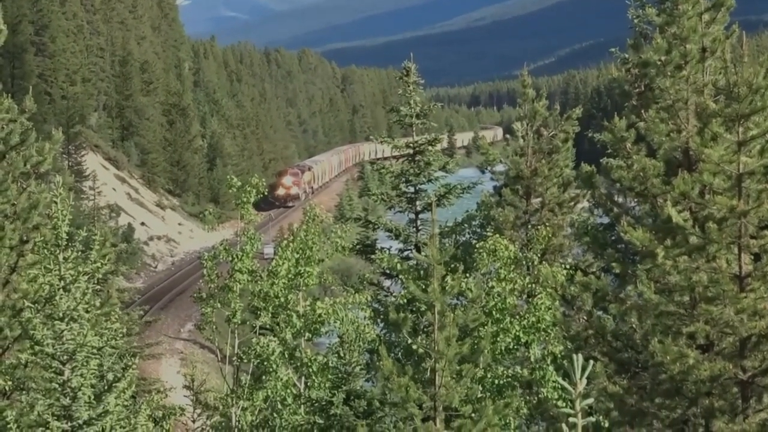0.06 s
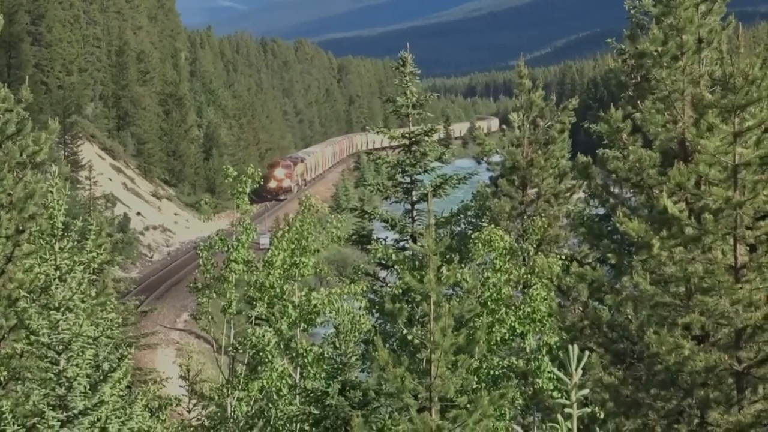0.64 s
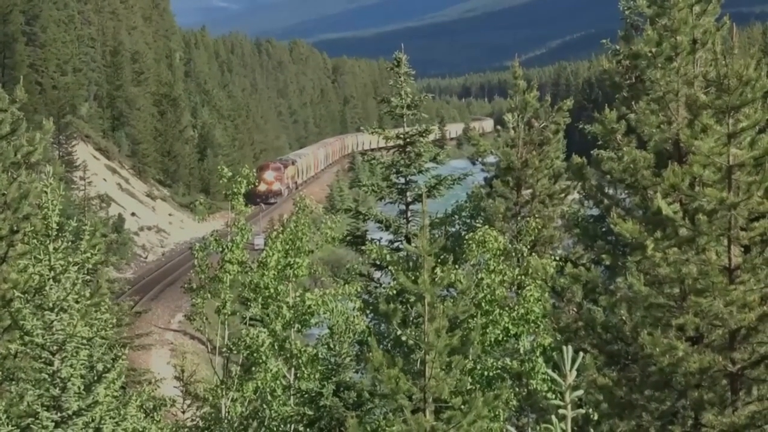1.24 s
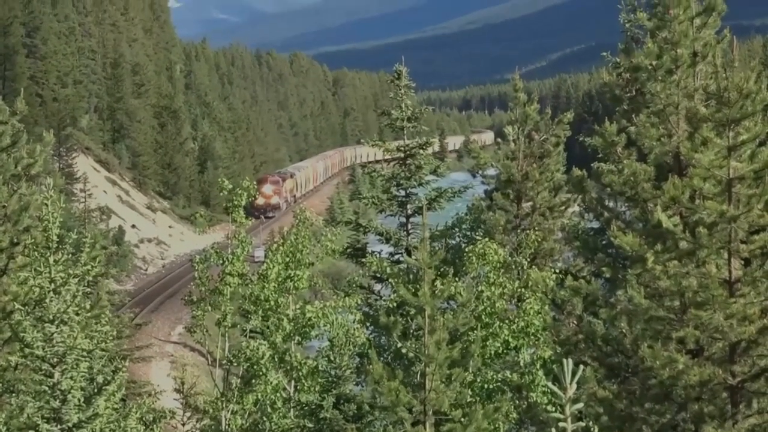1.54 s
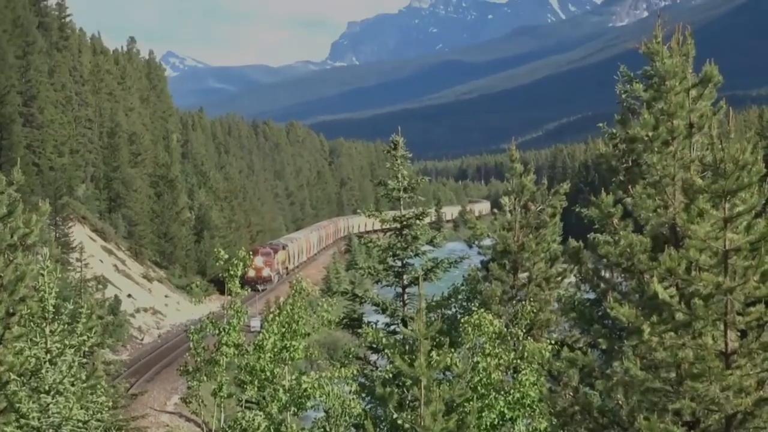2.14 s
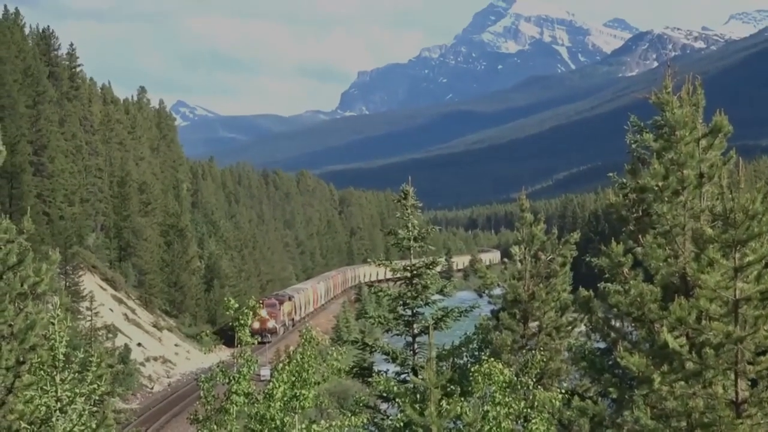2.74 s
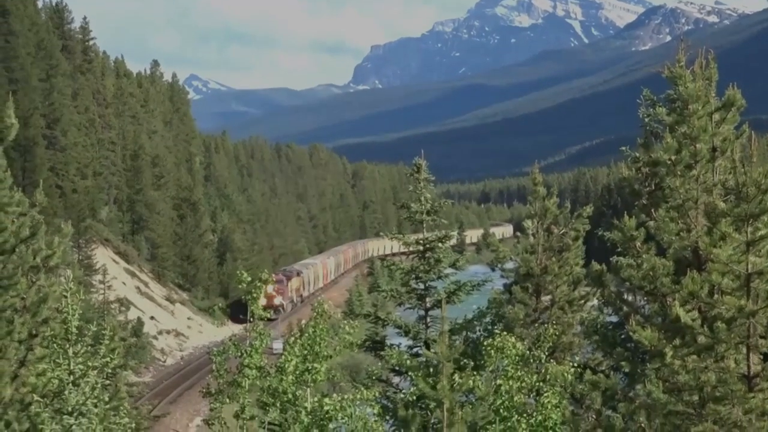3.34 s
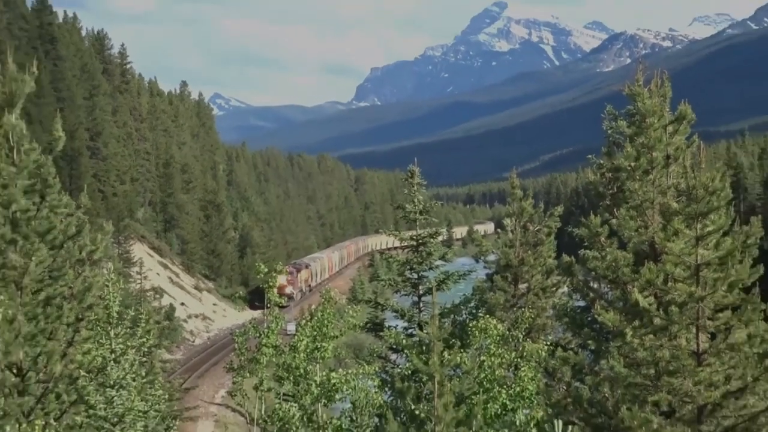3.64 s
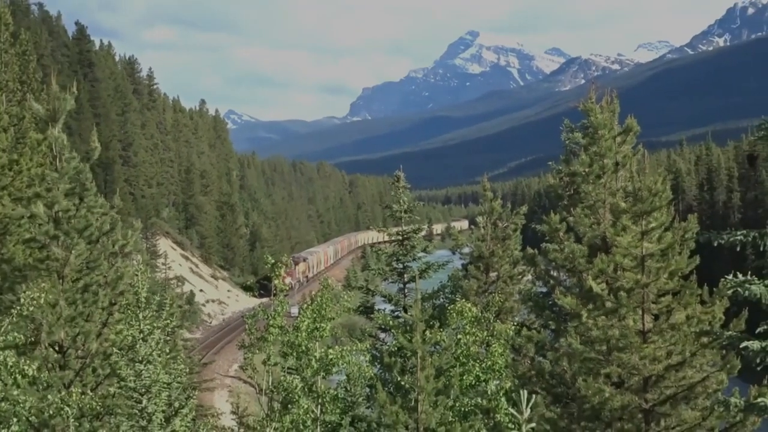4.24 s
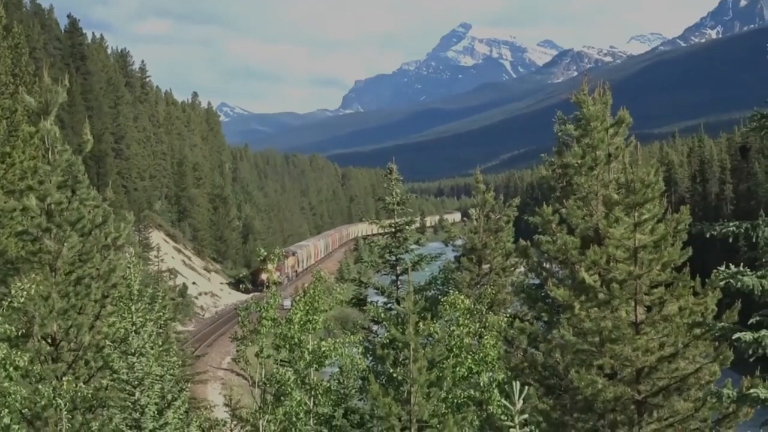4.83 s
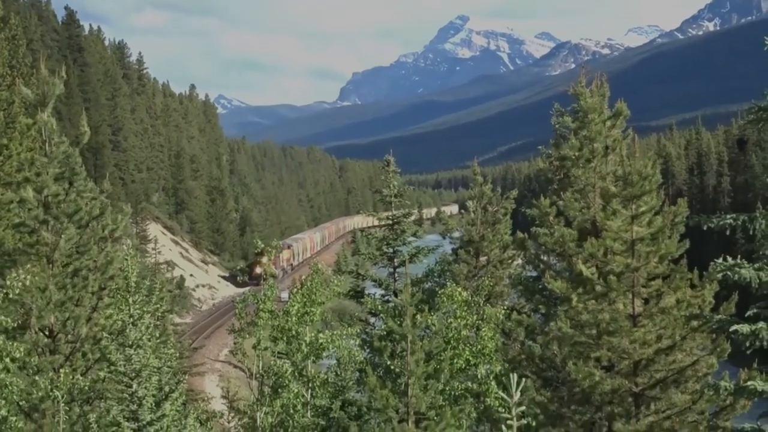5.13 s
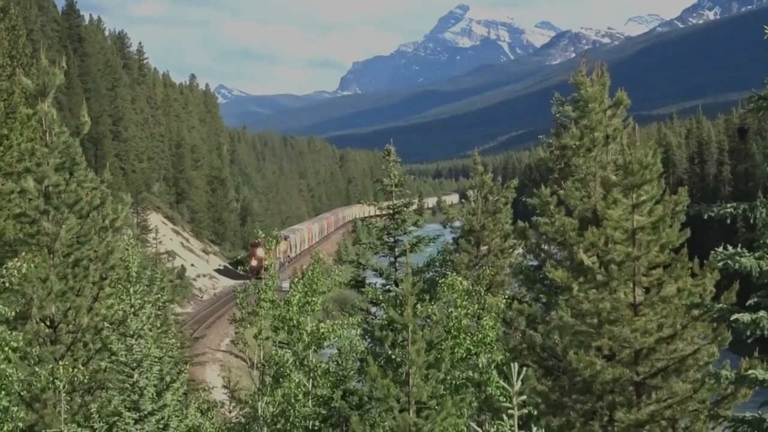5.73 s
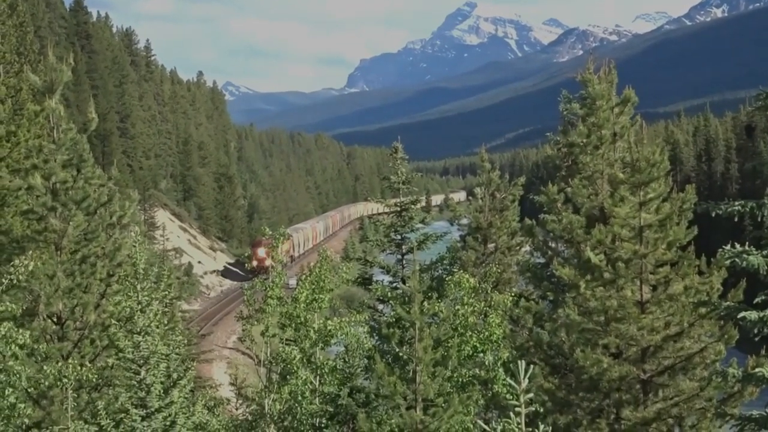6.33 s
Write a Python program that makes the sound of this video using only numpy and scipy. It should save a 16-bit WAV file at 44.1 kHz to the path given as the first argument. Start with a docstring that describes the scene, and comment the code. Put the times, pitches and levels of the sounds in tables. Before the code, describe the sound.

Distant diesel locomotives haul a freight train through a wooded valley for about six and a half seconds. From the start, a deep drone throbs about three times a second under a blurred, echoing exhaust roar and an even, lightly clattering rush of wheels. The rumble and rush grow gradually louder. The exhaust surges with a harder edge around 1 and 3 seconds, then several times after 4.5 seconds. From about 4.3 seconds the train sounds slightly brighter, and the wavering, mid-pitched hum of its radiator fans comes forward. From 5.8 seconds to the end, the wheels give a few thin, high, very brief squeals on a curve. Close to the microphone there is only a faint steady hiss, a few tiny dry ticks, and the very soft, high whirr of a camera's zoom motor from about 3.5 to 4.1 seconds.

```python
"""Diesel locomotives haul a freight train up a forested valley, far off, drawing nearer and rounding
a bank into the open. Their exhaust beats echo off the slopes and blur into a roar, while their radiator
fans hum. Under that is the rush of rolling wheels, with a few thin squeals from the curve near the end.
Close by there are only a faint hiss, some tiny ticks and the short whirr of a camera's zoom motor."""
import sys
import numpy as np
from scipy import signal
from scipy.fft import rfft, irfft, next_fast_len
from scipy.io import wavfile
from scipy.ndimage import uniform_filter1d, map_coordinates

SR = 44100
rng = np.random.default_rng(int(sys.argv[2]) if len(sys.argv) > 2 else 0)


def int16_out(signal):
    """Quantize to a 16-bit WAV file."""
    q = np.round(np.clip(np.atleast_2d(signal).T, -1, 1) * 32767)
    wavfile.write(sys.argv[1], SR, q.astype(np.int16))


N = 285768

# The tone colour of four noises. Each row: frequency in Hz, relative level in dB.
HISS_SPECTRUM = [(3000, -0.5), (5300, -0.5), (7100, 2), (7850, -7), (8350, -2.5), (8850, -3), (9800, -0.5),
                 (11000, 2), (11500, -2), (12200, -10), (15600, -13)]
ZOOM_SPECTRUM = [(7700, -30), (8270, 2), (8800, -20), (9500, -2), (10650, 5), (11200, -14), (15000, -24)]
WHEEL_SPECTRUM = [(200, -4), (500, -3.5), (800, -2), (1000, 1), (1270, -1), (1450, -5), (2050, -9.5),
                  (2900, -12.5), (3400, -16.5), (3650, -21), (3950, -22), (4300, -29), (4800, -32.5),
                  (5600, -59)]
RUMBLE_SPECTRUM = [(8, -24), (20, -14), (35, -7.5), (55, -3.5), (75, -4.5), (100, -3.5), (140, -2.5),
                   (300, -69)]
# How alike left and right sound. Each row: frequency in Hz, likeness from 0 to 1.
HISS_LIKENESS = [(5000, 0.73), (7200, 0.54), (8500, 0.84), (10500, 1), (13000, 1)]
TRAIN_LIKENESS = [(70, 0.98), (140, 0.99), (250, 0.99), (480, 0.98), (620, 1), (850, 0.94), (1200, 0.96),
                  (1500, 0.88), (2000, 0.93), (2900, 0.98), (3800, 0.93), (4800, 1)]
# Runs of the zoom motor. Each row: start in seconds, end in seconds, effort from 0 to 1.
ZOOM_RUNS = [(3.47, 4.023, 1), (4.07, 4.14, .7)]
# Dry ticks. Each row: time in seconds, level in dB, centre in Hz, spread in Hz, rough length in seconds.
NEARBY_TICKS = [(.034, -40, 13800, 1900, .002), (.078, -49, 11800, 2600, 0.0038),
                (0.733, -56, 9300, 800, 0.01), (3.173, -57.5, 10700, 900, .018),
                (5.395, -48, 4500, 4800, 0.012), (6.164, -48.5, 4620, 170, 0.007),
                (6.294, -51, 4550, 260, 0.008)]
# Wheel squeals. Each row: start and length in seconds, first pitch and its fall in Hz, base level in dB.
WHEEL_SQUEALS = [(5.82, 0.044, 3120, 15, -46), (5.952, 0.04, 3240, 30, -47), (5.996, .052, 3110, 10, -46),
                 (6.042, .05, 3130, 30, -42.5), (6.2, 0.072, 3530, 90, -43), (6.33, 0.096, 3505, 35, -41)]
# Notes of the radiator fan blades. Each row: pitch in Hz, level behind the bank in dB.
FAN_NOTES = [(580.5, -41.5), (610, -43), (634, -46)]
# Firm exhaust notes. Each row: pitch in Hz, level behind the bank in dB, change in the open in dB.
EXHAUST_NOTES = [(145.2, -34.5, -6), (232.3, -39, 4.5)]
# The locomotives' engines. Each row: firings per second, relative level in dB.
DIESEL_ENGINES = [(70.4, 0.5), (73.4, -2.5), (77, -5)]
# Where the exhaust resonates: the muffler's roar, the ring of the stack (the chimney), a harder bark.
# Each row: centre in Hz, rough width in Hz, relative level in dB.
MUFFLER_RESONANCES = [(215.7, 66, 0.5), (249, 71, -5.5), (338, 73, -6.5), (444, 103, -11)]
STACK_RESONANCES = [(579, 46, 0.5), (629, 50, -1), (692, 64, -8.5)]
BARK_RESONANCES = [(267, 40, 0.5), (352, 43, -5.5)]
# Roar and ring swell unevenly over the distance; the bark comes through in surges.
# Each row: time in seconds, level in dB.
ROAR_SWELLS = [(0.0, -23), (0.96, -22), (1.1, -22.5), (2.24, -22.5), (2.4, -23.5), (3.2, -22),
               (4.08, -22.5), (4.32, -19.5), (4.4, -24), (4.56, -22), (4.66, -21.5), (5.2, -22.5),
               (5.6, -21.5), (6.01, -20), (6.08, -17), (6.14, -19.5), (6.46, -20)]
RING_SWELLS = [(0.0, -30.5), (0.24, -29.5), (0.4, -34.5), (0.8, -27), (0.96, -31.5), (1.92, -27.5),
               (2.0, -32.5), (2.16, -28.5), (2.32, -31.5), (2.72, -29), (2.96, -30), (3.28, -28.5),
               (3.68, -30.5), (3.92, -27), (5.4, -28), (5.54, -28.5), (5.62, -27.5), (6.46, -28.5)]
BARK_SURGES = [(0.75, -47), (0.95, -27), (1.15, -43), (2.7, -39), (2.9, -31), (3.1, -37), (4.42, -34),
               (4.56, -25), (4.72, -38), (5.0, -30), (5.22, -24), (5.55, -25), (5.75, -31), (6.2, -27),
               (6.46, -32)]
# The sound leans to the right. Each row: frequency in Hz, left level minus right level in dB.
LEFT_RIGHT_BALANCE = [(600, -0.5), (1100, -1), (1600, -2), (3000, -1), (4000, -2.1), (5500, -1.4),
                      (6800, -3.5), (8000, -1), (9000, -2), (10500, 0)]


def amp(db):
    """Turn decibels into a number to multiply by."""
    return 10 ** (np.asarray(db) / 20)


def unit(x):
    """Scale a signal to an average power of 1."""
    return x / np.sqrt(np.mean(x ** 2) + 1e-20)


def over_pitch(points, hz):
    """Read between the rows of a (Hz, value) table, on a log frequency scale."""
    freqs, values = np.transpose(points)
    return np.interp(np.log(hz + 1), np.log(freqs + 1), values)


def over_time(points):
    """Turn a (seconds, value) table into one value per sample."""
    return np.interp(np.arange(N) / SR, *np.transpose(points))


def wobble(rate):
    """A smooth curve through `rate` random points a second."""
    knots = rng.standard_normal(int(N * rate / SR) + 4)
    fine = np.arange(0, len(knots) - 1, 1 / 10)
    return np.interp(np.arange(N) * rate / SR, fine, map_coordinates(knots, [fine]))


def filtered(x, response):
    """Multiply each frequency in x by response(hz)."""
    size = next_fast_len(N + SR // 8)
    return irfft(rfft(x, size) * response(np.fft.rfftfreq(size, 1 / SR)), size)[..., :N]


def steady(pair, span_s):
    """Even out the slow chance swells in a pair of signals."""
    power = np.abs(uniform_filter1d(np.mean(pair ** 2, axis=0), size=int(span_s * SR)))
    return unit(pair / np.sqrt(power + 1e-9))


def stereo(pair, colour, likeness):
    """Give two unrelated signals a tone colour and blend them into left and right."""
    def shares(hz):
        alike = np.clip(over_pitch(likeness, hz), -1, 1)
        return np.sqrt((1 + np.outer([1, -1], alike)) / 2)
    mid, side = filtered(pair, lambda hz: colour(hz) * shares(hz))
    return unit(np.array([mid + side, mid - side]))


def rush(spectrum, likeness, patchy_db):
    """Stereo noise with random louder and softer patches in pitch and time."""
    cells = signal.stft(rng.standard_normal((2, N)), nperseg=512)[2]
    patches = uniform_filter1d(rng.standard_normal(cells.shape[1:]), size=6, axis=0)
    patches = uniform_filter1d(patches, size=14, axis=1)
    pair = signal.istft(cells * amp(patchy_db * unit(patches)), nperseg=512)[1][:, :N]
    top_hz = 2 * spectrum[-1][0]
    return stereo(pair, lambda hz: amp(over_pitch(spectrum, hz)) * (hz < top_hz), likeness)


def valley(x, fade_s):
    """The wooded slopes scatter a sound into two blurred echoes that fall 60 dB in fade_s."""
    tails = rng.standard_normal((2, SR)) * amp(-60 * np.arange(SR) / SR / fade_s)
    return signal.fftconvolve(x[None], tails / np.linalg.norm(tails[0]), axes=1)[:, :N]


def approach(start_db, db_per_s):
    """The growing loudness of something that comes steadily nearer."""
    return amp(start_db + db_per_s * np.arange(N) / SR)


def in_the_open(start_s=4.26, takes_s=1.7):
    """0 while the bank hides the front of the train, rising to 1 as it rounds the curve."""
    return np.clip((np.arange(N) / SR - start_s) / takes_s, 0, 1)


def hiss_and_zoom(hiss_db=-57, whirr_db=-64, dip_db=-4, spin_up_s=.02):
    """A faint steady hiss, whose lower part sinks while the zoom motor whirrs."""
    t = np.arange(N) / SR
    running = sum(effort * np.clip(np.minimum(t - start, end - t) / spin_up_s, 0, 1)
                  for start, end, effort in ZOOM_RUNS)
    hiss = amp(hiss_db) * steady(rush(HISS_SPECTRUM, HISS_LIKENESS, patchy_db=1.6), span_s=.1)
    lower_hiss = filtered(hiss, lambda hz: hz < 7700)
    whirr = amp(whirr_db) * steady(rush(ZOOM_SPECTRUM, HISS_LIKENESS, patchy_db=1.5), span_s=.05)
    return hiss + running * (whirr + (amp(dip_db) - 1) * lower_hiss)


def ticks():
    """Each tick is a very short puff of high noise."""
    t, freqs = np.arange(SR // 8) / SR, np.fft.rfftfreq(SR // 8, 1 / SR)
    out = np.zeros(N + SR)
    for peak_s, db, hz, spread, length in NEARBY_TICKS:
        band = np.exp(-.5 * ((freqs - hz) / spread) ** 2)
        noise = unit(irfft(rfft(rng.standard_normal(len(t))) * band, len(t)))
        start = max(round((peak_s - 2 * length) * SR), 0)
        out[start:start + len(t)] += amp(db) * noise * np.exp(-2 * (t / length - 2) ** 2)
    return out[:N]


def squeals(waver=.0064, edge_s=.0099, echo_db=-14, chatter_db=1.5):
    """A wheel's rim rubs the curved rail: a thin tone that sags in pitch, smeared by the slopes."""
    t, out = np.arange(N) / SR, np.zeros(N)
    unsteady = 1 + waver * wobble(180)
    pressure = amp(chatter_db * wobble(90))
    for start, length, start_hz, fall_hz, db in WHEEL_SQUEALS:
        on = (t > start) & (t < start + length)
        age = t[on] - start
        pitch = (start_hz - fall_hz * age / length) * unsteady[on]
        grip = np.clip(np.minimum(age, length - age) / edge_s, 0, 1) * pressure[on]
        out[on] += amp(db) * grip * np.sqrt(2) * np.sin(2 * np.pi * np.cumsum(pitch) / SR)
    direct = out * amp([[-2.5], [1.5]])  # louder on the right
    return direct + amp(echo_db) * valley(out, fade_s=.2)


def wheels(treble_hz=3480, open_treble_db=3):
    """Hundreds of steel wheels roll as one distant, slightly clattering rush, brighter in the open."""
    clatter_db = .34 * wobble(45) + 1.12 * wobble(110)
    noise = rush(WHEEL_SPECTRUM, TRAIN_LIKENESS, patchy_db=.83)
    rolling = steady(amp(clatter_db) * noise, span_s=.16)
    treble = filtered(rolling, lambda hz: hz > treble_hz)
    brightened = rolling + (amp(open_treble_db * in_the_open()) - 1) * treble
    return approach(start_db=-31.5, db_per_s=.43) * brightened


def far_note(hz, waver, fading_db):
    """A machine's tone that wavers and fades in and out on its way through the air."""
    pitch = hz * (1 + waver * wobble(9))
    tone = np.sin(2 * np.pi * np.cumsum(pitch) / SR)
    return unit(tone * amp(fading_db * wobble(5)))


def fans(open_gain_db=7.5):
    """Each radiator fan hums on its own note, heard better once the engines are in the open."""
    hum = sum(amp(db) * far_note(hz, waver=.0019, fading_db=4) for hz, db in FAN_NOTES)
    return amp(open_gain_db * in_the_open()) * hum


def exhaust_notes():
    """Two low multiples of the firing rates stand out; the higher one takes over in the open."""
    return sum(amp(db + open_db * in_the_open()) * far_note(hz, waver=.01382, fading_db=3.5)
               for hz, db, open_db in EXHAUST_NOTES)


def firings(rate_hz, drift=.014, uneven=.35, scatter=.78, cylinders=12):
    """One exhaust pulse per firing; each cylinder has its own strength, and no two cycles are equal."""
    fired = np.cumsum(rate_hz * (1 + drift * wobble(5))) / SR
    at = np.flatnonzero(np.diff(np.floor(fired)))
    strengths = 1 + uneven * rng.standard_normal(cylinders)
    sizes = np.resize(strengths, len(at)) + scatter * rng.standard_normal(N)[:len(at)]
    pulses = np.bincount(at, sizes, N)
    return unit(pulses - pulses.mean())


def exhaust(beats, resonances, beats_db):
    """Beats and the noise of swirling gas sound through the exhaust's resonances."""
    def peak(hz, centre, width):
        return (hz * width) ** 2 / ((centre ** 2 - hz ** 2) ** 2 + (hz * width) ** 2)
    def colour(hz):
        powers = [(amp(db) * peak(hz, centre, 2 * width)) ** 2 for centre, width, db in resonances]
        return np.sqrt(sum(powers))
    blast = amp(beats_db) * beats + rng.standard_normal((2, N))
    return steady(stereo(blast, colour, TRAIN_LIKENESS), span_s=.137)


def locomotives(drone_db=-30.5, throb_hz=2.91, throb_db=3, throb_peak_s=.0094, flutter_db=.2):
    """Three engines' beats, blurred by the slopes, drone, roar, ring and bark over a growing rumble."""
    beats = sum(amp(db) * firings(rate) for rate, db in DIESEL_ENGINES)
    blurred = unit(valley(beats, fade_s=.66))
    # The deep drone fills the valley evenly, and throbs because the engines run slightly out of step.
    throb = throb_db * np.cos(2 * np.pi * throb_hz * (np.arange(N) / SR - throb_peak_s))
    drone = amp(drone_db + throb) * exhaust(blurred, [(144, 23.6, 0)], beats_db=-9)
    roar = amp(over_time(ROAR_SWELLS)) * exhaust(blurred, MUFFLER_RESONANCES, beats_db=-11.5)
    ring_db = over_time(RING_SWELLS) - flutter_db * wobble(30)
    ring = amp(ring_db) * exhaust(blurred, STACK_RESONANCES, beats_db=-8.5)
    bark = amp(over_time(BARK_SURGES)) * exhaust(blurred, BARK_RESONANCES, beats_db=-9)
    rumble = steady(rush(RUMBLE_SPECTRUM, TRAIN_LIKENESS, patchy_db=.9), span_s=.14)
    return drone + roar + bark + ring + approach(start_db=-34.5, db_per_s=.98) * rumble


def scene(lag_s=.00007):
    """The train lies a little to the right, so its engines reach the left side later."""
    sides = np.array([[.5], [-.5]])  # left, right
    engines = locomotives() + exhaust_notes() + fans()
    engines = filtered(engines, lambda hz: np.exp(-2j * np.pi * hz * lag_s * sides))
    everything = engines + wheels() + squeals() + ticks() + hiss_and_zoom()
    return filtered(everything, lambda hz: amp(sides * over_pitch(LEFT_RIGHT_BALANCE, hz)))


def record(dry, top_hz=15720):
    """Cut away the very highest treble."""
    return filtered(dry, lambda hz: hz < top_hz)


dry = scene()
out = record(dry)
int16_out(out)
```